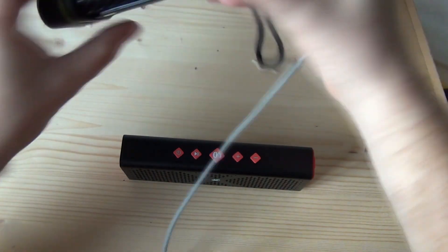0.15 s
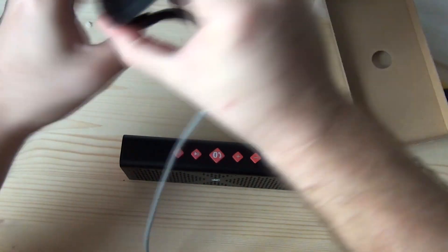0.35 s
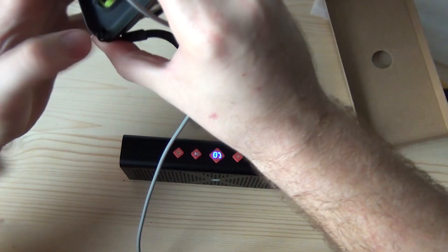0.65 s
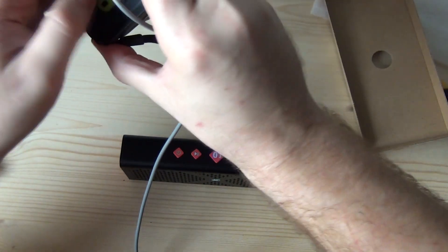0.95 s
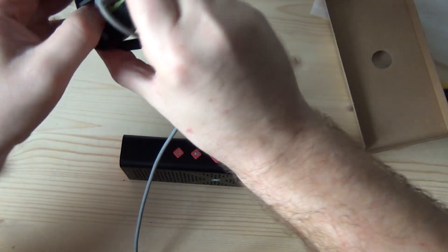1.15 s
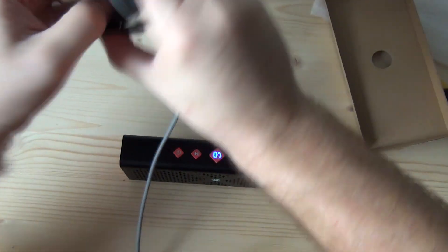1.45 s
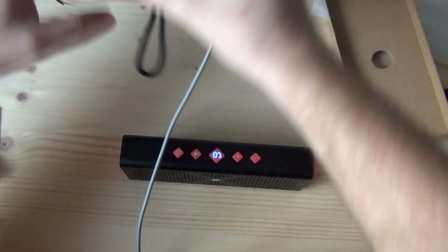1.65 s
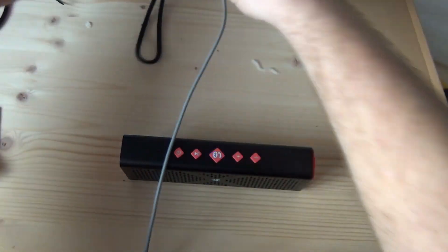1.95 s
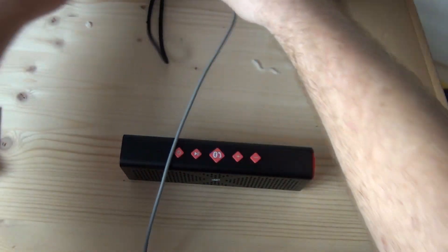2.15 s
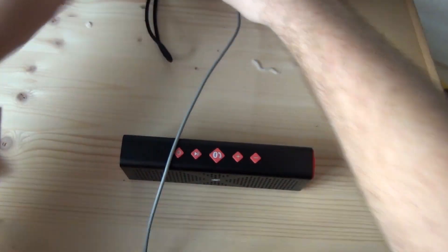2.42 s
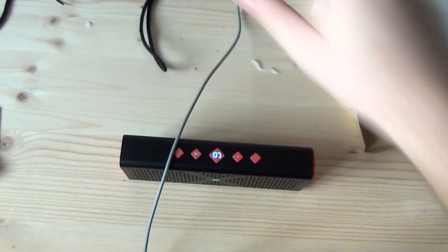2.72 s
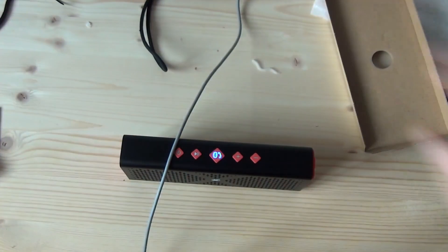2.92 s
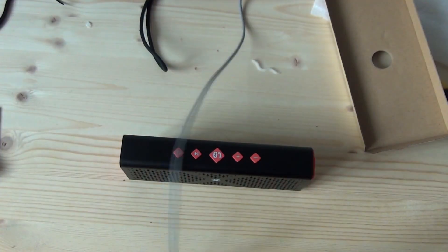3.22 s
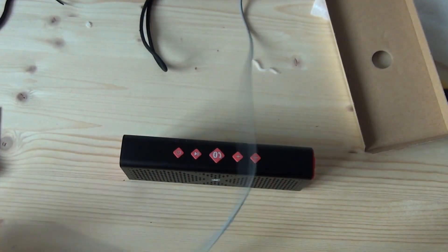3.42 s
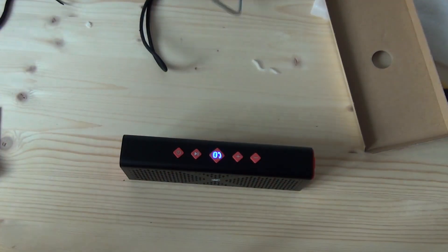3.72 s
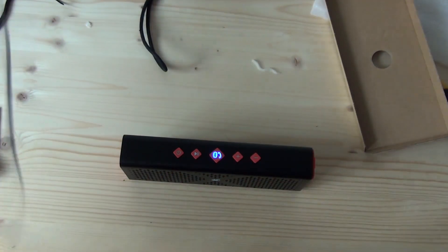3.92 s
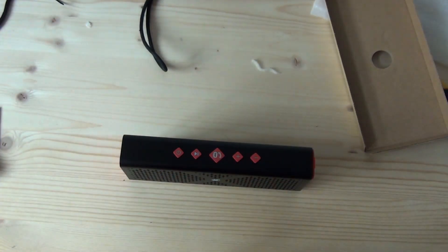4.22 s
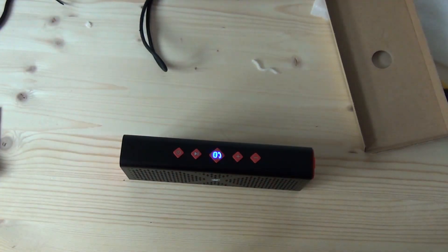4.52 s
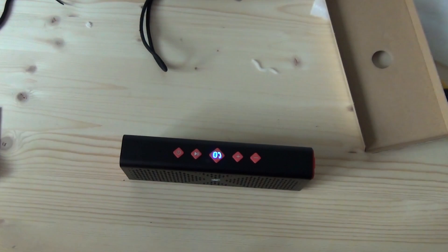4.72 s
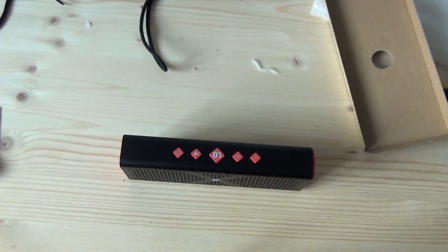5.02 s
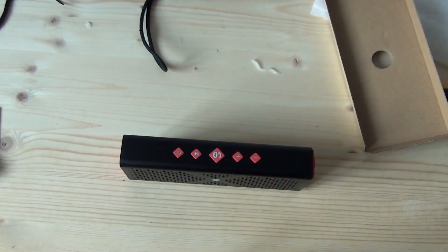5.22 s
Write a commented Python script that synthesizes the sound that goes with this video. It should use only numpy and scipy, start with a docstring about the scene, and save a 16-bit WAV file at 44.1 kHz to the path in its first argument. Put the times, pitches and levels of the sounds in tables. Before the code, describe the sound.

Soft rubbing of hands and cable, then a device thumps and rocks on a wooden tabletop, followed by a case knock and clattering board.

```python
"""Hands unplug a small device over a wooden table and put it and its cables aside, in a small room.
Skin and cable rub as shaped noise and plugs tick as short chatters; things land on the tabletop,
ringing its modes, and rock to rest; a cable zips over an edge as a gliding friction tone.
Then the plastic case knocks down a little way off, a board clatters and loose plugs click after it.
Quiet room air and a faint, steady electronic whine run throughout."""
import sys
import numpy as np
from scipy import signal
from scipy.fft import rfft, irfft
from scipy.io import wavfile

SR = 44100
rng = np.random.default_rng(int(sys.argv[2]) if len(sys.argv) > 2 else 0)


def unload_wav(signal):
    """Save mono or channel-first audio to the path in sys.argv[1] as 16-bit WAV at rate SR, clipped to [-1, 1]."""
    wavfile.write(
        sys.argv[1],
        SR,
        np.round(np.clip(np.atleast_2d(signal).T, -1, 1) * 32767).astype(np.int16),
    )


N = 236772
TIME = np.arange(N) / SR

# things landing on the tabletop, each rocking to rest; the last three rows are faint bumps as plugs knock on
# the board: # (time [s], level [dB], contact hardness [Hz], first rock gap [s], loss per rock [dB])
LANDING_EVENTS = [(2.2646, -11, 129, 0.037, 3), (2.4791, -6, 510, 0.049, 7.5),
                  (2.752, -7.5, 582, 0.067, 2.5), (4.398, -26.5, 304, 0.14, 5), (5.064, -34, 268, 0.05, 9),
                  (5.274, -42, 356, 0.05, 9)]


def from_db(db):
    """Decibels to gain."""
    return 10 ** (np.asarray(db) / 20)


def rms_one(x):
    """Scale to unit power."""
    return x / np.sqrt(np.mean(x ** 2) + 1e-20)


def in_time(rows):
    """Each column of a curve at every sample."""
    s, *columns = np.transpose(rows)
    return [np.interp(TIME, s, column) for column in columns]


def at_hz(points, hz):
    """Read a table on a log-frequency axis."""
    table_hz, value = np.transpose(points)
    return np.interp(np.log(hz), np.log(table_hz), value)


def bins(size):
    """Frequencies of a real transform [Hz], kept above zero."""
    return np.maximum(np.fft.rfftfreq(size, 1 / SR), 1)


def add(track, s, sound):
    """Mix a sound in at a time."""
    start = min(int(round(s * SR)), N)
    track[start:start + len(sound)] += sound[:N - start]


def convolve(x, response):
    """Pass a track through a response."""
    return signal.fftconvolve(x, response)[:N]


def causal(gain):
    """Minimum-phase response with these gains, by folding the cepstrum."""
    cepstrum = irfft(np.log(gain + 1e-9))
    half = len(cepstrum) // 2
    cepstrum[1:half] *= 2
    cepstrum[half + 1:] = 0
    return irfft(np.exp(rfft(cepstrum)))


def noise(spectrum):
    """Steady noise of a given colour, unit power."""
    white = rfft(rng.standard_normal(N))
    return rms_one(irfft(white * from_db(at_hz(spectrum, bins(N))), N))


def drift(rate_hz):
    """Random values about zero, drawn at a rate and joined by straight lines."""
    return np.interp(TIME * rate_hz, np.arange(N), rng.standard_normal(N))


def ringing(modes):
    """One second of decaying modes, each starting at full speed."""
    t = TIME[:SR]
    total = 0
    for hz, db, t60_s in modes:
        decay = np.exp(-np.log(1000) * t / t60_s)
        total = total + from_db(db) * np.cos(2 * np.pi * hz * t) * decay
    return total


def contact(length_s, gain, size=4096):
    """A hard touch: a short chatter of tiny collisions, coloured by the body and by the spot that is hit."""
    hz = bins(size)
    age = TIME[:size] / max(length_s, 1e-4)
    fade = (1 + 2 * age) * np.exp(-2 * age)
    burst = rng.standard_normal(size) * fade
    # flatten the spectrum, keep the phases
    burst = irfft(np.exp(1j * np.angle(rfft(burst)))) * np.minimum(1, 10 * fade)
    spot = np.interp(hz / 260, np.arange(100), rng.standard_normal(100))
    ripple_db = 3 * spot * np.minimum(hz / 2500, 1)
    sound = signal.fftconvolve(burst, causal(gain * from_db(ripple_db)))[:size]
    return rms_one(sound) * np.sqrt(np.mean(fade ** 2))


def swell(start_s, length_s, attack_s, release_s, sag_db_per_s):
    """A sliding move gathers speed, slackens slowly and stops."""
    age = np.maximum(TIME - start_s, 0)
    stop = np.exp(-np.clip((age - length_s) / release_s, 0, 50))
    sag = from_db(-sag_db_per_s * np.minimum(age, length_s))
    return np.minimum(age / attack_s, 1) * sag * stop


def glide(curve, overtones_db, waver):
    """A friction tone that follows a curve of pitch and level."""
    hz, db = in_time(curve)
    phase = 2 * np.pi * np.cumsum(hz * (1 + waver * drift(1700))) / SR
    sounding = (TIME > curve[0][0]) & (TIME < curve[-1][0])
    tone = sum(from_db(level) * np.sin(k * phase) for k, level in enumerate(overtones_db, 1))
    return sounding * from_db(db) * tone


def room(x, build_s, wall_hz, count=9):
    """Diffuse reflections build up, then die away at a rate set per band; walls dull the treble."""
    # reverberation: (frequency [Hz], decay by 60 dB [s])
    room_t60 = [(130, 0.78), (400, 0.56), (1000, 0.44), (2800, 0.44), (7000, 0.2), (15000, 0.6)]
    t, hz = TIME[:SR], bins(SR)
    white = rfft(rng.standard_normal(SR))
    centres_hz = np.geomspace(60, 16000, count)
    tail = 0
    for centre_hz, share in zip(centres_hz, np.eye(count)):
        band = irfft(white * at_hz(np.c_[centres_hz, share], hz), SR)
        decay = np.exp(-np.log(1000) * t / at_hz(room_t60, centre_hz))
        tail = tail + band * decay / np.hypot(1, centre_hz / wall_hz)
    tail = tail * (1 - np.exp(-(t / build_s) ** 2))
    return convolve(x, tail / np.sqrt(np.sum(tail ** 2)))


def room_air(level_db=-56):
    """The quiet room: steady coloured noise."""
    # colour: (frequency [Hz], relative level [dB])
    air_colour = [(15, -63), (25, -21.5), (175, 2), (249, -17), (503, -12), (560, -17.5), (840, -12),
                  (1130, -19.5), (1370, -15), (1650, -24.5), (2610, -29), (4740, -28), (6560, -24.5),
                  (12200, -26.5), (16000, -32)]
    return from_db(level_db) * noise(air_colour)


def whine(hz=13248, level_db=-75):
    """A faint, steady electronic whine: one sine."""
    return from_db(level_db) * np.sin(2 * np.pi * hz * TIME)


def grip(attack_s=0.02, release_s=0.015, sag_db_per_s=17.5, resting_db=-68.5, resting_hz=6460):
    """Level of the sliding skin and its friction band centre [Hz], weighted by the power of each stroke."""
    # strokes of skin along a cable: (time [s], length [s], level [dB], friction band centre [Hz])
    strokes = [(0.111, 0.044, -45, 6210), (0.15, 0.09, -51, 7100), (0.233, 0.019, -49, 5230),
               (0.314, 0.16, -58, 6540), (0.481, 0.02, -49, 6230), (0.627, 0.04, -51, 6250),
               (0.956, 0.042, -53, 9800), (1.054, 0.022, -50.5, 11200), (1.524, 0.11, -54.5, 5860),
               (1.674, 0.085, -50.5, 6240), (1.895, 0.11, -46, 5940), (2.0, 0.34, -49.5, 5450),
               (2.288, 0.063, -54, 3610), (3.131, 0.139, -56, 7100), (3.373, 0.093, -50, 7340),
               (3.552, 0.06, -59, 7660), (4.617, 0.18, -52.5, 8260), (5.21, 0.16, -58.5, 6500)]
    # fingers shifting between the strokes
    resting = from_db(resting_db) ** 2
    total, weighted_hz = resting, resting * resting_hz
    for s, length_s, db, centre_hz in strokes:
        power = (from_db(db) * swell(s, length_s, attack_s, release_s, sag_db_per_s)) ** 2
        total = total + power
        weighted_hz = weighted_hz + power * centre_hz
    return np.sqrt(total), weighted_hz / total


def pulling(attack_s=0.13, release_s=0.076, sag_db_per_s=1.5, creep_db=-59):
    """Level of the cable dragging on the wood, over a floor of slack cable creeping."""
    # a cable pulled across the wood: (time [s], length [s], level [dB])
    pulls = [(0.413, 0.39, -56), (1.508, 0.64, -55), (2.087, 0.34, -50), (2.89, 0.51, -49),
             (4.602, 0.91, -54.5)]
    power = from_db(creep_db) ** 2
    for s, length_s, db in pulls:
        power = power + (from_db(db) * swell(s, length_s, attack_s, release_s, sag_db_per_s)) ** 2
    return np.sqrt(power)


def rubbing(catch_db=2.5, drag_db=-4.0, hiss_db=1.0, narrow_db=-3.5, wide_db=-5.0, narrow_hz=280, wide_hz=1700):
    """Sliding surfaces hiss and catch unevenly; a friction band moves with the grip."""
    # skin hiss: (frequency [Hz], relative level [dB])
    hiss_colour = [(1200, -22), (2200, -5), (4200, -11.5), (5500, 1), (7000, -2), (9500, -6.5),
                   (12500, -3.5), (16000, -14)]
    # cable dragging on wood: (frequency [Hz], relative level [dB])
    scuff_colour = [(150, -51), (250, -3), (384, -5), (496, -8.5), (640, -12), (1380, -10), (1640, -16),
                    (4000, -19.5), (5200, -36.5), (8800, -120)]
    rub, centre_hz = grip()
    carrier = np.cos(2 * np.pi * np.cumsum(centre_hz + narrow_hz * drift(600)) / SR)
    hiss = from_db(hiss_db) * noise(hiss_colour)
    # the band has a sharp core and broad shoulders
    for half_width_hz, db in ((narrow_hz, narrow_db), (wide_hz, wide_db)):
        lowpass = signal.butter(2, half_width_hz, fs=SR, output="sos")
        band = signal.sosfilt(lowpass, rng.standard_normal(N))
        hiss = hiss + from_db(db) * rms_one(band * carrier)
    drag = noise(scuff_colour) * pulling() * from_db(drag_db)
    return (rub * rms_one(hiss) + drag) * from_db(catch_db * drift(70))


def cable_zip():
    """The sheath sings faintly, higher the faster it is drawn, and squeaks as it slips."""
    # cable drawn over an edge: (time [s], pitch [Hz], level [dB])
    zip_curve = [(2.87, 2250, -85), (2.92, 2830, -70), (2.97, 3600, -68), (3.01, 3820, -65),
                 (3.05, 3740, -67), (3.11, 3810, -66), (3.15, 3570, -70), (3.21, 3200, -85)]
    # sheath squeaking: (time [s], pitch [Hz], level [dB])
    squeak_curve = [(2.94, 7900, -92), (2.962, 7950, -58), (2.99, 8200, -69), (3.015, 8480, -63),
                    (3.04, 8480, -61), (3.06, 8100, -85)]
    song = glide(zip_curve, overtones_db=[-3, -4, -5, -1], waver=.01)
    return song + glide(squeak_curve, overtones_db=[0], waver=.008)


def ticks(resonance_db=3.0, width=0.037, body_db=8.0, body_width=0.17, size=4096):
    """Small hard plugs touch the wood and each other, each with a resonance of its own."""
    # plugs and cable ends: (time [s], level [dB], contact length [s], brightness [dB per octave],
    # own resonance [Hz], bass [dB])
    tick_events = [(0.263, -45.5, 0.0044, -2, 1960, -19), (0.948, -36, 0.0052, 3, 1980, -1),
                   (1.3652, -27.5, 0.003, 8.5, 5580, 29.5), (1.799, -41.5, 0.009, 4, 6060, -9),
                   (1.843, -32.5, 0.0036, 3, 5680, 4), (2.302, -28.5, 0.0043, -3.5, 3550, -21),
                   (2.347, -34, 0.013, -11, 553, 12), (3.165, -35, 0.0094, -5.5, 3300, -2),
                   (3.179, -34, 0.0026, -9, 5000, -3), (3.1964, -23.5, 0.0061, 5, 7200, 17),
                   (3.3686, -25.5, 0.01, -7, 2720, -4.5), (3.462, -39, 0.0065, 2, 5940, -20),
                   (3.497, -39, 0.004, 23, 14300, 6), (3.751, -23, 0.0097, 3, 7500, 5),
                   (4.358, -17, 0.0055, -5, 4120, -9), (4.4045, -20, 0.0026, 4, 5570, 1),
                   (4.467, -15, 0.0057, -11, 1830, -16), (4.595, -20, 0.0033, 1, 2405, -6),
                   (4.8602, -15.5, 0.0047, 0.5, 5620, 5), (5.051, -22.5, 0.0029, -2, 2700, 1),
                   (5.061, -21.5, 0.0051, -2.5, 3200, 2), (5.078, -18.5, 0.0033, 1, 6450, 11)]
    # colour common to all: (frequency [Hz], relative level [dB])
    tick_colour = [(80, -9), (250, -4.5), (630, 2), (1000, -2.5), (1350, 1.5), (1900, -4.5), (2800, -1.5),
                   (4000, -2), (5400, -3.5), (6900, -3.5), (8000, -7.5), (10000, -7.5), (16000, -24)]
    out, hz = np.zeros(N), bins(size)
    for s, db, length_s, tilt_db, own_hz, bass_db in tick_events:
        detune = np.log(hz / own_hz)  # widths are in the same log-frequency units
        own_db = resonance_db / (1 + (detune / width) ** 2)
        own_db = own_db + body_db / (1 + (detune / body_width) ** 2)
        slope_db = tilt_db * np.log2(1 + hz / 1000) + bass_db / (1 + (hz / 550) ** 4)
        gain = from_db(at_hz(tick_colour, hz) + slope_db + own_db)
        add(out, s, from_db(db) * contact(length_s, gain))
    return out


def knocks(blows, modes, ring_gain_db, size=4096):
    """A body cracks on each contact and then rings on in its modes."""
    # colour of the cracks: (frequency [Hz], relative level [dB])
    knock_colour = [(80, -16), (270, 1), (700, 1.5), (1000, -0.5), (1480, 3.5), (1900, -1), (2500, -3.5),
                    (3100, -4), (4200, -8.5), (6000, -7.5), (8000, -21), (15000, -23)]
    cracks, pushes, hz = np.zeros(N), np.zeros(N), bins(size)
    for s, db, length_s, bass_db, dull_hz, ring_db in blows:
        colour = from_db(at_hz(knock_colour, hz) + bass_db / (1 + (hz / 800) ** 2))
        gain = colour / np.hypot(1, (hz / dull_hz) ** 2.16)
        add(cracks, s, from_db(db) * contact(length_s, gain))
        add(pushes, s, from_db([db + ring_db + ring_gain_db]))
    # neighbouring modes swing in opposite directions and take a moment to spread through the body
    spread = 1 - np.exp(-TIME[:SR] / 0.0086)
    ring = (ringing(modes[::2]) - ringing(modes[1::2])) * spread
    return np.array([cracks, convolve(pushes, ring)])


def case_knocks():
    """The plastic case knocks down: its cracks and its ring."""
    # blows: (time [s], level [dB], contact length [s], bass [dB], dull above [Hz], ring [dB])
    case_blows = [(3.828, -23.5, 0.0078, -13, 2230, -13), (3.8305, -22, 0.01, -26, 1900, -23),
                  (3.834, -13, 0.012, -7.5, 4050, -1), (3.854, -22, 0.023, -8, 5760, 11.5),
                  (3.877, -23.5, 0.034, -22, 4800, 11.5)]
    # case modes: (frequency [Hz], relative level [dB], decay by 60 dB [s])
    case_modes = [(269.2, 6.5, 0.47), (401, 3, 0.21), (570, -5, 0.27), (666, 13, 0.18), (910, -6, 0.36),
                  (1140, -25, 0.33), (1160, -23, 0.23), (1550, 16, 0.071), (1515, -15.5, 0.81),
                  (1710, -3, 0.59), (1947, -7, 0.47), (2256, -18.5, 0.76), (2520, -15, 0.16),
                  (2850, -16, 0.22), (3350, -21, 0.3), (3660, -11, 0.17)]
    return knocks(case_blows, case_modes, ring_gain_db=-20.0)


def board_clatter():
    """A wooden board clatters under the case: its cracks and its ring."""
    # blows: (time [s], level [dB], contact length [s], bass [dB], dull above [Hz], ring [dB])
    board_blows = [(4.349, -32, 0.012, 7.5, 3450, 4), (4.359, -11.5, 0.0071, -0.5, 7400, 1.5),
                   (4.372, -15.5, 0.0056, 10, 3980, 6.5), (4.403, -26, 0.0059, 14, 3040, 13),
                   (4.467, -15.5, 0.0056, 3, 2150, -3.5), (4.483, -44, 0.0044, 18, 2200, -12),
                   (4.505, -25, 0.0049, 24, 2770, 4), (4.525, -25, 0.0063, 8, 3220, -2),
                   (4.542, -40, 0.0056, 7, 1890, -7)]
    # board modes: (frequency [Hz], relative level [dB], decay by 60 dB [s])
    board_modes = [(185.7, -10, 0.53), (292, -14, 0.36), (403, 7.5, 0.28), (424, 2, 0.3), (697, 4.5, 0.44),
                   (740, -1.5, 0.39), (815, -3, 0.44), (917, -14, 0.58), (1080, -6.5, 0.58),
                   (1224, -12.5, 0.67), (1364, 6, 0.18), (1720, -16, 0.29), (1730, -9, 0.19),
                   (2070, -26, 0.29), (2100, -10, 0.27), (2500, -6, 0.16)]
    return knocks(board_blows, board_modes, ring_gain_db=-17.0)


def rocking(count=9):
    """Each landing rocks ever faster and weaker as its contact settles; yields (s, level dB, hardness Hz)."""
    edge_lead_s, edge_db = 0.0058, -12  # an edge touches just before the whole weight
    rebound_s, rebound_db = 0.0295, -12.5  # every rock bounces once
    gap_ratio = 0.8974  # each gap against the one before
    settled_hz, settling_ratio = 200, 0.68  # hardness closes in on the settled one by this ratio per rock
    for s, db, hard_hz, gap_s, loss_db in LANDING_EVENTS:
        yield s - edge_lead_s, db + edge_db, hard_hz
        for k in range(count):
            yield s, db, hard_hz
            yield s + rebound_s, db + rebound_db, hard_hz
            s = s + gap_s * gap_ratio ** k
            db = db - loss_db
            hard_hz = settled_hz + (hard_hz - settled_hz) * settling_ratio


def shell_on_wood():
    """The hard shell rasps briefly on every blow, most on the hard ones, and skids a little after each landing."""
    # rasp colour: (frequency [Hz], relative level [dB])
    rasp_colour = [(700, -4), (1400, 5), (2500, -3), (4000, -5.5), (6500, -5.5), (10000, -9), (16000, -18)]
    # skid colour: (frequency [Hz], relative level [dB])
    skid_colour = [(150, -25), (280, -2.5), (400, -1), (550, -3.5), (700, -4.5), (900, -14), (1500, -31),
                   (4000, -65)]
    # level against the blow at the nominal hardness, gain with hardness, decay time constant
    rasp_db, nominal_hz, db_per_octave, decay_s = -30, 550, 17, 0.0077
    skid_db, skid_follows = -40, 0.53  # level after a 0 dB landing, share of the landing's dB
    blows = np.zeros(N)
    for s, db, hard_hz in rocking():
        hardness_db = db_per_octave * np.log2(hard_hz / nominal_hz)
        add(blows, s, from_db([db + rasp_db + hardness_db]))
    rasp = signal.lfilter([1], [1, -np.exp(-1 / (decay_s * SR))], blows + 1e-18)
    skid = np.zeros(N)
    for s, db, *_ in LANDING_EVENTS:
        slide = swell(s, length_s=0.18, attack_s=0.017, release_s=0.028, sag_db_per_s=49.5)
        skid += from_db(skid_db + skid_follows * db) * slide
    return rasp * noise(rasp_colour) + skid * noise(skid_colour)


def tabletop(radiates_above_hz=88, damped_above_hz=880):
    """Each soft blow is a rounded push on the board; harder ones reach its higher modes."""
    # tabletop modes: (frequency [Hz], relative level [dB], decay by 60 dB [s])
    table_modes = [(74, -62, .3), (98, -22, 0.23), (130, -10, 0.4), (152.7, -36, 0.083), (175, -24.5, 0.2),
                   (187, -13, 0.49), (174.5, -4, 0.081), (220, -55, .15), (274.4, -18, 0.43),
                   (310, -8, 0.16), (334.8, -19, 0.38), (404.4, -17.5, 0.18), (363, -3, 0.024),
                   (483, -23, 0.42), (564, -9.5, 0.096), (686, -49, 0.18), (866, -5, 0.088)]
    force, t = np.zeros(N), TIME[:SR // 20]
    for s, db, hard_hz in rocking():
        push = t ** 3 * np.exp(-2 * np.pi * 1.38 * hard_hz * t)
        weight = 1 + (170 / hard_hz) ** 2  # softer blows push more
        add(force, s, from_db(db) * push / push.sum() * weight)
    # air slips round the board, so its deepest motion is weakened; the wood absorbs the treble
    highpass = signal.butter(3, radiates_above_hz, "high", fs=SR, output="sos")
    lowpass = signal.butter(4, damped_above_hz, fs=SR, output="sos")
    return signal.sosfilt(np.vstack([highpass, lowpass]), convolve(force, ringing(table_modes)))


def scene():
    """Near sounds come mostly direct; the knocks come from farther off and fill the room."""
    # hands move off to the side, so more comes back from the walls: (time [s], reflected share [dB])
    reflected = [(3.15, -11.5), (3.4, -9.5)]
    background = room_air() + whine()
    near = rubbing() + cable_zip() + ticks() + shell_on_wood()
    cracks, rings = case_knocks() + board_clatter()
    thumps = tabletop()
    near_room = room(near * from_db(in_time(reflected)[0]), build_s=0.0011, wall_hz=7400)
    far_room = from_db(-4.5) * room(cracks, build_s=0.0025, wall_hz=9900)
    boom = from_db(-16) * room(thumps, build_s=0.014, wall_hz=5030)
    direct = thumps + cracks + rings + near
    return (direct + near_room + far_room + boom + background)[None]


def record(dry):
    """The tallest peaks are rounded, the deepest bass is lost and the top is cut."""
    rounded = dry / (1 + (dry / .7) ** 4) ** .25
    highpass = signal.butter(2, 45, "high", fs=SR, output="sos")
    top_cut = signal.ellip(10, .2, 80, 16300, fs=SR, output="sos")
    return signal.sosfilt(top_cut, signal.sosfilt(highpass, rounded))


dry = scene()
out = record(dry)
unload_wav(out)
```